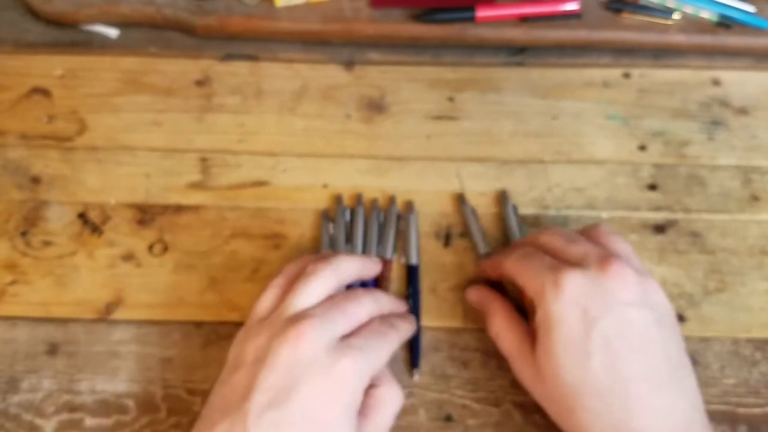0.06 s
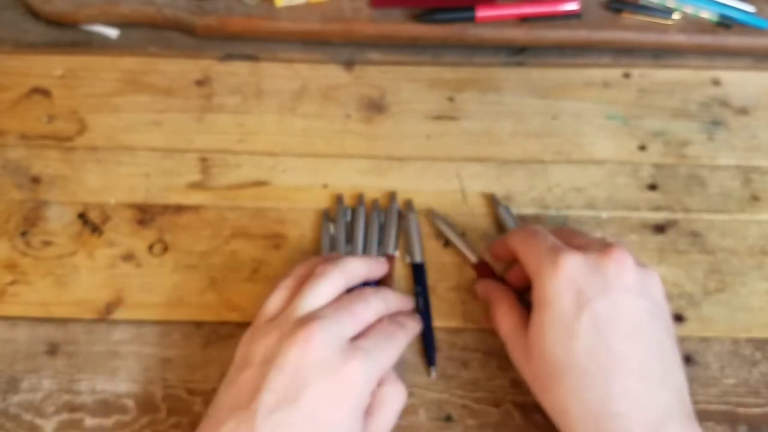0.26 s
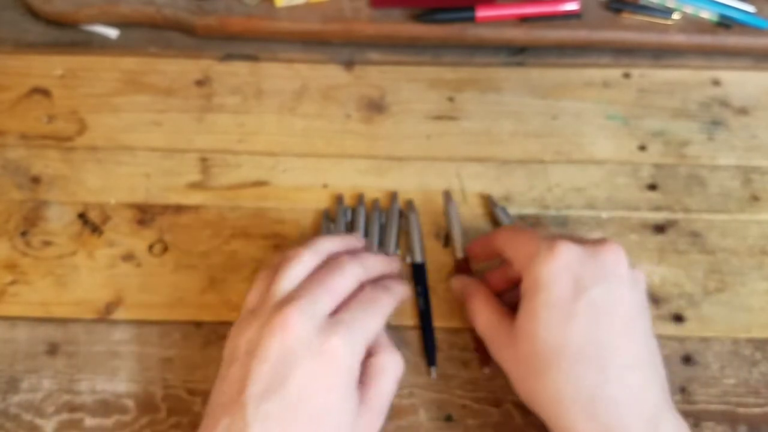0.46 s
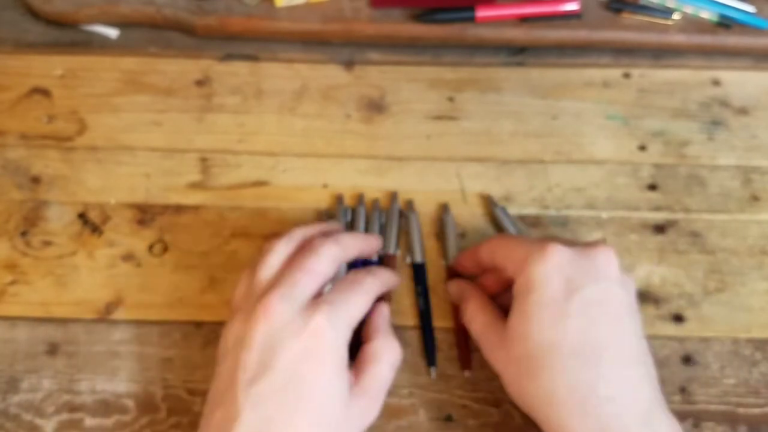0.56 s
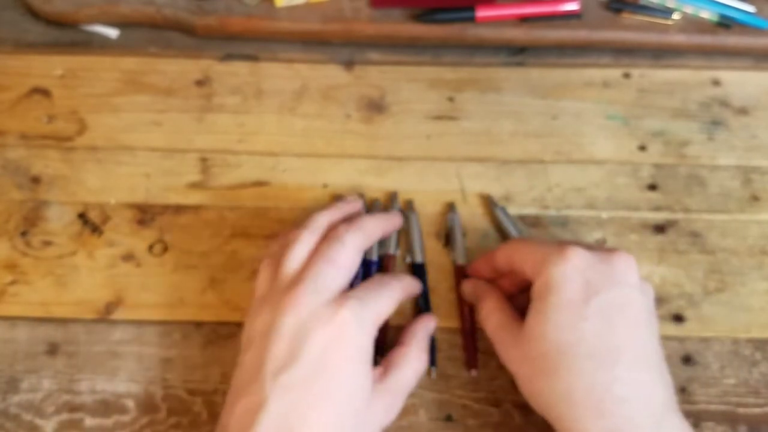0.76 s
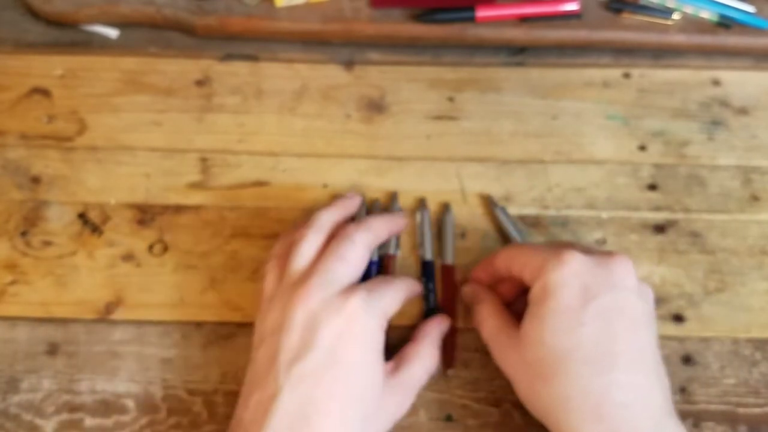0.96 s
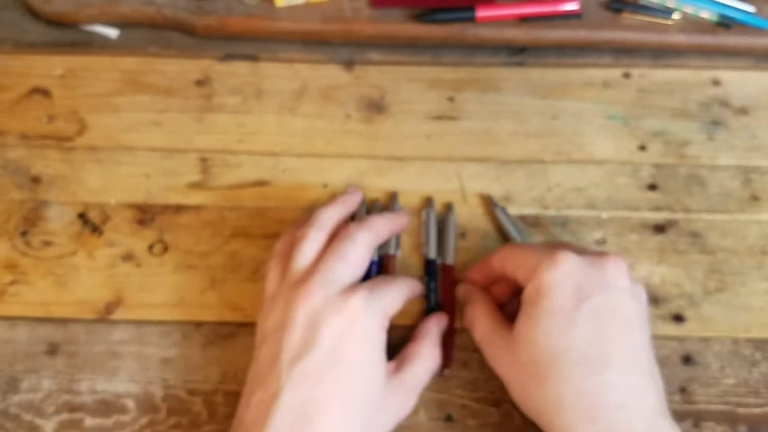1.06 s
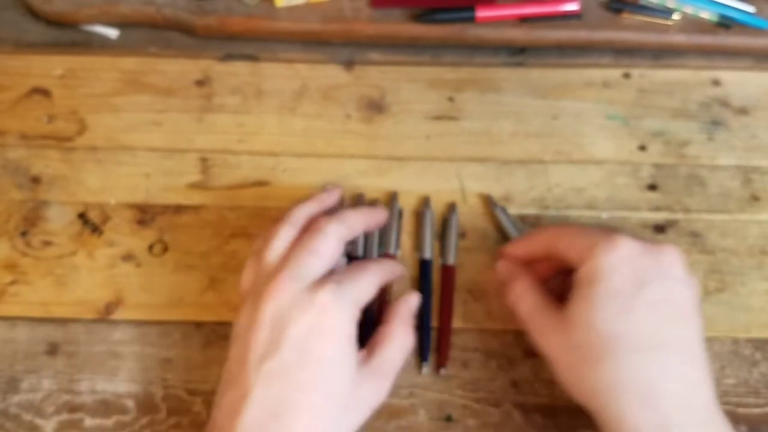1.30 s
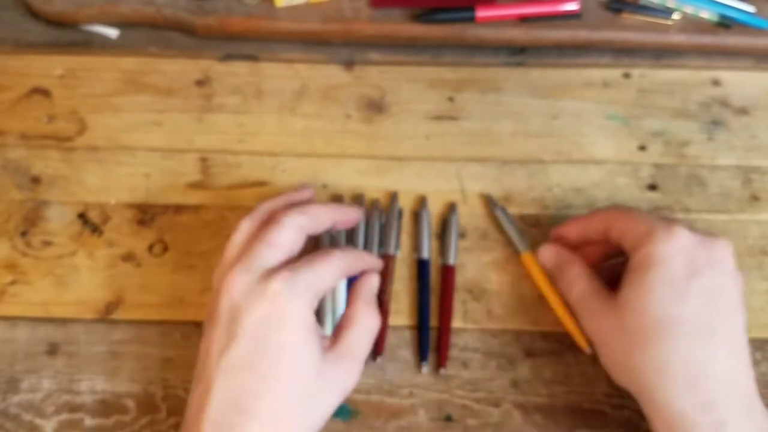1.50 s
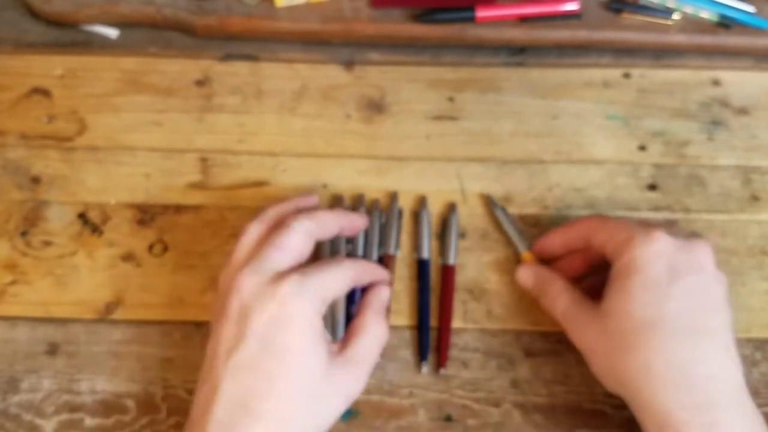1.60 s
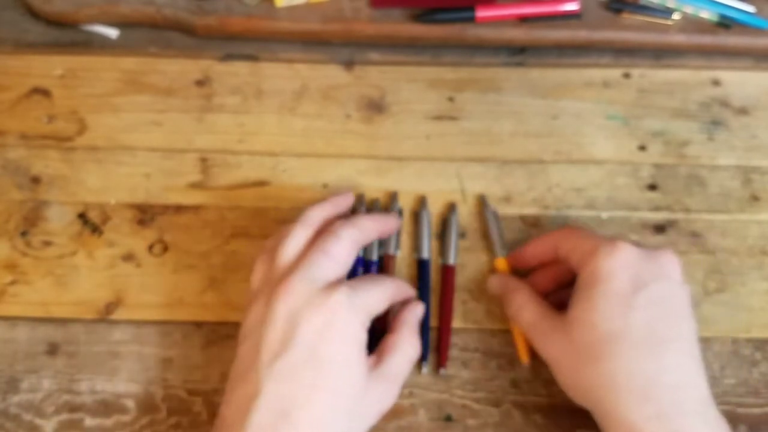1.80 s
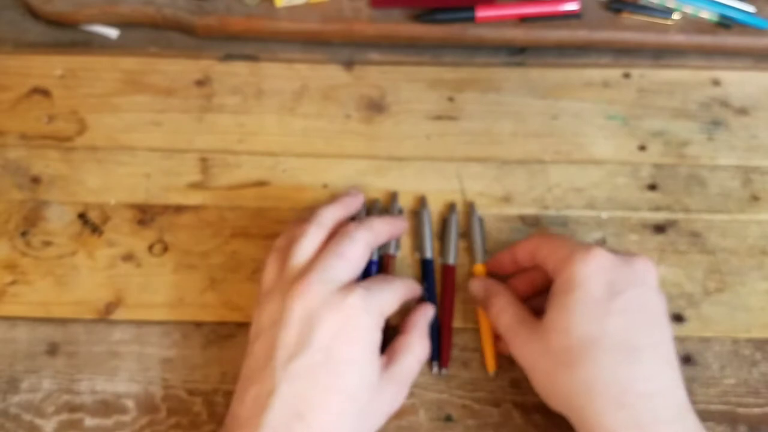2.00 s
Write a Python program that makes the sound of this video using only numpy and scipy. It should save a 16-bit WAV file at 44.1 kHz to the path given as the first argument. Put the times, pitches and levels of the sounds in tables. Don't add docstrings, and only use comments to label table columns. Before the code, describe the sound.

Pen barrels tap and slide on wood in a small quiet room, closely miked; a small cluster of clicks, a loud sharp crack, a short lull, two clear clacks, then scattered faint touches over low hum and hiss.

```python
import sys
import numpy as np
from scipy import signal
from scipy.fft import irfft
from scipy.io import wavfile

SR = 44100
rng = np.random.default_rng(int(sys.argv[2]) if len(sys.argv) > 2 else 0)


def elevation(decibels):
    levels = np.asarray(decibels, float)
    return 10 ** (levels / 20)


def wrap_up_sound(samples):
    columns = np.atleast_2d(samples).T
    tamed = np.clip(columns, -1, 1)
    steps = np.round(tamed * 32767).astype(np.int16)
    wavfile.write(sys.argv[1], SR, steps)


N = 90404
TAIL = 16384
DELAY_S = 0.001042
MODE_SPREAD_DB = 2.0


def rms_one(x):
    return x / np.sqrt(np.mean(x ** 2) + 1e-20)


def at_hz(points, hz):
    table = np.array(points)
    return np.interp(np.log(hz), np.log(table[:, 0]), table[:, 1])


def drift(rate_hz):
    pole = np.exp(-80 * np.pi * rate_hz / SR)
    white = rng.standard_normal(N // 40 + 2002)
    slow = signal.lfilter([1], [1, -2 * pole, pole * pole], white)[2000:]
    return np.interp(np.arange(N) / 40, np.arange(len(slow)), rms_one(slow))


def high_pass(x, cut_hz, order=2):
    return signal.sosfilt(signal.butter(order, cut_hz, "high", fs=SR, output="sos"), x)


def band_pass(x, edges_hz):
    return signal.sosfilt(signal.butter(2, edges_hz, "band", fs=SR, output="sos"), x)


def soften(x, cut_hz):
    cut_hz = np.clip(cut_hz, 200, 16000)
    return signal.sosfilt(signal.butter(2, cut_hz, fs=SR, output="sos"), x)


def add(out, s, sound):
    i = max(int(s * SR), 0)
    out[:, i:i + sound.shape[1]] += sound


def dying(t60):
    t60 = np.maximum(np.asarray(t60), .002)
    return elevation(-60 * np.arange(TAIL) / SR / t60[..., None])


EDGES = 28 * 2 ** np.arange(0, 9.6, .5)


def bands(size, alike):
    white, out = rng.standard_normal((2, 2, size + 4000)), []
    centres = np.sqrt(EDGES[1:] * EDGES[:-1])
    for k, (low, high) in enumerate(zip(EDGES, EDGES[1:])):
        mid, side = band_pass(white[k % 2], [low, high])[:, 4000:]
        c = np.clip(at_hz(alike, centres[k]), -.99, .99)
        out.append(np.sqrt(1 + c) * mid + np.sqrt(1 - c) * side * [[1], [-1]])
    return centres, np.array(out)


# (frequency [Hz], coherence [-1 to 1])
NEAR_COHERENCE = [(100, .98), (350, .93), (700, .5), (1300, -.15), (3000, .3), (12000, .2)]


def dense(spectrum, t60_table):
    hz, noise = bands(TAIL, NEAR_COHERENCE)
    decay = elevation(at_hz(spectrum, hz))[:, None] * dying(at_hz(t60_table, hz))
    out = np.sum(noise * decay[:, None], axis=0)
    return out / np.sqrt(np.mean(out[:, :128] ** 2)) / 2


def ringing(modes, spread_db):
    hz, db, t60 = np.transpose(modes)
    luck = rng.standard_normal((len(hz), 3))
    lag = np.arccos(np.clip(at_hz(NEAR_COHERENCE, hz), -1, 1)) * np.sign(luck[:, 2])
    phase = 2 * np.pi * hz[:, None] * np.arange(TAIL) / SR
    decay = dying(np.minimum(t60, .2))
    channels = []
    for k in (0, 1):
        waves = np.sin(phase + k * lag[:, None] * (phase > np.pi))
        channels.append(elevation(db + spread_db * luck[:, k]) @ (waves * decay))
    return np.array(channels)


# (time [s], peak level [dB])
LANDING = [
    (0.429, -12.5),
]
# (delay [s], level [dB])
BOUNCES = [
    (0, -4),
    (.0014, 1),
    (.0031, -1),
    (.0045, -6),
    (.008, -6),
]
# (frequency [Hz], level [dB], t60 [s])
LANDING_MODES = [(161.5, -14.5, 0.53), (214, -26.5, 0.28), (306.4, -9.5, 0.062), (475, -11.5, 0.062),
                 (559, -3.5, 0.1), (767, -6, 0.1), (1066, -1.5, 0.038), (1620, -12.5, 0.087),
                 (2065, -11, 0.05), (2348, -13, 0.17), (2368, -12, 0.045), (2540, -13.5, 0.11),
                 (2950, -21, 0.11), (3000, -29, 0.023)]
# (frequency [Hz], level [dB], t60 [s])
BARREL_MODES = [(2035, -5.5, 0.008), (2400, -2.5, 0.007), (3200, -13.5, 0.015), (4430, -14, 0.007)]
# (frequency [Hz], t60 [s])
CRACK_T60 = [(150, 0.12), (600, 0.17), (1500, .03), (2500, .015), (6000, 0.013)]
# (frequency [Hz], density [dB per Hz])
WOOD_SPECTRUM = [(59, -30), (100, -2.5), (676, -10.5), (1310, 2), (1520, -2.5), (2320, 0.5), (4570, -7.5),
                 (6150, -38), (16000, -14)]


def knock():
    cut_hz, low_hz = 6170, 380
    dense_db, modes_db = -6.5, -8
    build_s = .002
    out, (s, db) = np.zeros((2, N + TAIL)), LANDING[0]
    fade_in = np.minimum(np.arange(TAIL) / SR / build_s, 1)
    ring = ringing(LANDING_MODES, MODE_SPREAD_DB) * fade_in
    add(out, s + DELAY_S, -elevation(db + modes_db) * ring)
    for delay, touch_db in BOUNCES:
        body = elevation(dense_db) * dense(WOOD_SPECTRUM, CRACK_T60) - ringing(BARREL_MODES, MODE_SPREAD_DB)
        crack = high_pass(soften(body, cut_hz), low_hz)
        add(out, s + DELAY_S + delay, elevation(db + touch_db) * crack)
    return out[:, :N]


# (time [s], peak level [dB], strongest ring [Hz], plank boom re tap [dB], ring re tap [dB])
LIGHT_TAPS = [(0.001, -40, 1250, -18, -12), (0.056, -45, 575, -1, -5), (0.087, -49, 762, -21, 14.5),
              (0.12, -45.5, 1120, -18, 5), (0.175, -40.5, 1090, -9.5, -10), (0.187, -32, 1270, -11.5, -9.5),
              (.1925, -31.5, 1220, -24, -3), (0.2, -28, 1007, -14.5, 2.5), (.208, -49.5, 810, 2, -8),
              (0.214, -40, 705, -16, -4), (0.296, -49, 930, -0.5, 3), (0.349, -42.5, 1510, -5, -5),
              (0.391, -41, 560, -3.5, -13), (.834, -60, 557, -2, 0), (.878, -50.5, 740, -2, 0),
              (.9, -43, 780, -12, -6), (0.915, -28.5, 1144, -9, 0.5), (.947, -45.5, 920, 6, -12),
              (0.9895, -25, 1166, -52, 0.5), (.997, -33, 800, -13, 8.5), (1.005, -37.5, 790, -17, 6.5),
              (1.2595, -36.5, 1156, -6, -5), (1.2825, -40.5, 984, -3.5, 10), (1.352, -50.5, 550, -9, -1),
              (1.403, -54.5, 1280, -12, -1), (1.487, -52.5, 946, -7, 3), (1.545, -47.5, 590, -3.5, -8),
              (1.603, -58, 570, 1, -7), (1.66, -44.5, 820, -24, -5), (1.682, -49, 580, -3.5, 0),
              (1.761, -45, 976, 0, 7), (1.784, -52.5, 1200, 5, 13), (1.899, -41, 1144, -8, 3),
              (1.91, -45.5, 1460, -8, -14), (2.028, -47, 940, -27, -5), (2.04, -46, 770, -25, 3.5),
              (1.043, -43, 1020, -7.5, 4)]
# (frequency [Hz], level [dB], t60 [s])
PLANK_MODES = [(163.6, -11, 0.6), (223.6, -20, 0.033), (292, 5.5, 0.047), (323, -8.5, 0.27),
               (442, -4, 0.12)]
# (frequency [Hz], t60 [s])
WOOD_DECAY = [(150, 0.19), (600, 0.089), (2000, 0.039), (6000, 0.01), (14000, 0.014)]


def taps():
    cut_hz, harder_per_db = 1657, 0.18
    low_hz = 507
    boom_trim_db, dense_db, ring_trim_db, ring_t60 = -4.5, 4.5, -2.5, .028
    out = np.zeros((2, N + TAIL))
    woods = [high_pass(dense(WOOD_SPECTRUM, WOOD_DECAY), low_hz) for k in range(5)]
    for k, (s, db, hz, boom_db, ring_db) in enumerate(LIGHT_TAPS):
        boom = elevation(boom_trim_db + boom_db) * ringing(PLANK_MODES, 2.0)
        wood = elevation(dense_db) * woods[k % 5]
        barrel = [(hz, ring_trim_db, ring_t60), (0.95 * hz, ring_trim_db - 15.5, ring_t60)]
        body = boom + wood + elevation(ring_db) * ringing(barrel, MODE_SPREAD_DB)
        hardness = elevation(harder_per_db * (db + 31.5))
        add(out, s + DELAY_S, -elevation(db) * soften(body, cut_hz * hardness))
    return out[:, :N]


# (frequency [Hz], density [dB per Hz])
METAL_SPECTRUM = [(1200, -26), (2500, 2), (4300, -2), (6500, -8.5), (8500, -5.5), (11000, -5.5),
                  (15000, -0.5), (16500, -0.5)]


def snap():
    hz = np.maximum(np.arange(65) * SR / 128, 1)
    click = irfft(elevation(at_hz(METAL_SPECTRUM, hz)))
    return np.roll(click, 64)[None] / np.sqrt(np.sum(click ** 2))


# (time [s], peak level [dB], centre [Hz], width [octaves], rattle length [s])
METAL_TICKS = [(0.033, -50.5, 9250, 0.94, 0.0033), (0.058, -46, 11000, 3.8, 0.003),
               (0.187, -34.5, 12800, 3.2, 0.0022), (.298, -48, 9000, 3.3, 0.0051),
               (0.351, -43.5, 4600, 1.57, 0.0014), (.391, -44.5, 4600, 1.5, 0.0033),
               (0.4312, -21.5, 9800, 1.01, 0.00074), (0.624, -54.5, 8000, 4.8, 0.01),
               (0.909, -49.5, 12100, 0.48, 0.0069), (0.937, -26, 8820, 2.9, 0.0031),
               (1.0005, -45.5, 7240, 0.4, 0.00094), (1.018, -49, 8500, 0.094, 0.00077),
               (1.045, -35.5, 8600, 1.6, 0.0022), (1.261, -55.5, 9000, 1.34, 0.0021),
               (1.387, -55, 14200, 0.53, 0.00077), (1.724, -44.5, 8600, 1.86, 0.0032),
               (1.725, -52, 4330, 0.58, 0.0044), (1.726, -46.5, 2500, 0.28, 0.0016),
               (1.898, -55, 7040, 1.9, 0.0052), (2.019, -56, 2470, 0.18, 0.017)]


def ticks():
    own_share = .9
    trim_db = 2
    out = np.zeros((2, N + 2 * TAIL))
    for s, db, hz, octaves, length in METAL_TICKS:
        t = np.arange(4096) / SR / max(length, .0002)
        luck = rng.standard_normal((4, 4096))
        touching = luck[0] > .4
        contacts = touching * (luck[1] + own_share * luck[2:]) * (t + 0.49) * np.exp(-t)
        edges = np.clip(hz * 2 ** (np.array([-.5, .5]) * max(octaves, .1)), 500, 19000)
        sound = band_pass(signal.fftconvolve(contacts, snap(), axes=1), edges)
        add(out, s - 64 / SR, elevation(db + trim_db) * sound / np.abs(sound).max())
    return out[:, :N]


# (start [s], length [s], level [dB], skin hiss brightness [dB])
STROKES = [(-.02, 0.05, -44, -12), (0.061, 0.052, -48, -17), (0.11, 0.098, -57, -8.5),
           (0.191, 0.055, -48, -9.5), (0.213, 0.2, -61, -28), (0.84, 0.053, -64, -29),
           (0.886, 0.095, -45.5, -18), (0.916, 0.026, -39.5, -37), (0.984, 0.05, -50.5, -3),
           (1.251, 0.11, -55, -39.5), (1.387, 0.24, -66.5, -6), (1.543, 0.18, -58.5, -19),
           (1.649, 0.11, -47.5, -19.5), (1.747, 0.15, -51, -22), (1.904, 0.016, -46, -32),
           (1.959, 0.1, -60, -28), (1.999, 0.24, -48, -17)]
# (frequency [Hz], density [dB per Hz])
RUB_SPECTRUM = [(120, -9), (290, -4.5), (550, -3), (1100, -2.5), (1800, -11.5), (2450, -18.5),
                (4500, -29.5), (9000, -43)]
# (frequency [Hz], t60 [s])
HISS_T60 = [(3000, .003), (16000, .002)]


def rubbing():
    slips_per_s, trim_db = 1600, 0.5
    clumping = elevation(2.5 * drift(30))
    slips = (rng.random(N) < slips_per_s * clumping / SR) * rng.standard_normal(N)
    stroke, hiss, t = np.zeros(N), np.zeros(N), np.arange(N) / SR
    for s, length, db, bright_db in STROKES:
        progress = np.clip((t - s) / length, 0, 1)
        swell = elevation(db + trim_db) * np.sin(np.pi * progress ** 0.56) ** 2
        stroke += swell
        hiss += swell * elevation(bright_db)
    wood = dense(RUB_SPECTRUM, WOOD_DECAY) + elevation(-18) * ringing(PLANK_MODES, 3.0)
    metal = dense(METAL_SPECTRUM, HISS_T60)
    out = 0
    for grain, pressure in ((wood, stroke), (metal, hiss)):
        unit_grain = grain / np.sqrt(np.sum(grain[0] ** 2))
        force = (rms_one(slips) * pressure)[None]
        out = out + signal.fftconvolve(force, unit_grain, axes=1)[:, :N]
    return out


# (time [s], level [dB], frequency [Hz], length [s])
HAND_LEANS = [
    (0.686, -56, 88, .1),
    (0.778, -55, 92, 0.1),
    (0.631, -66.5, 450, 0.15),
    (1.27, -53, 86.4, 0.089),
    (1.478, -53, 57.3, 0.15),
    (1.83, -63, 90, 0.067),
]


def leans():
    t, out = np.arange(N) / SR, 0
    for s, db, hz, length in HAND_LEANS:
        swell = np.sin(np.pi * np.clip((t - s) / length, 0, 1)) ** 2
        out = out + elevation(db) * swell * np.sin(2 * np.pi * hz * t)
    return out


# (frequency [Hz], t60 [s])
ROOM_DECAY = [(100, 0.22), (260, 0.32), (700, 0.24), (1840, 0.21), (4850, 0.27), (12800, 0.13)]


def room(near):
    level_db, build_s = -20, .007
    # (frequency [Hz], density [dB per Hz])
    colour = [(100, -13), (300, -3), (1000, -4.0), (3000, -1), (5000, -7.0), (7000, 0), (16000, 3.0)]
    build_up = np.minimum(np.arange(TAIL) / SR / build_s, 1)
    answer = dense(colour, ROOM_DECAY) * build_up
    return elevation(level_db) * signal.fftconvolve(near[:1], answer, axes=1)[:, :N] / 2


# (frequency [Hz], density [dB per Hz])
AIR_SPECTRUM = [(30, -7), (60, -12), (100, -7), (200, -11), (300, -16), (1000, -22.5), (3000, -27.5),
                (7500, -42), (14000, -35.5), (16000, -30)]
# (frequency [Hz], coherence [-1 to 1])
AIR_COHERENCE = [(60, 1), (240, 0.53), (950, 0.26), (4000, 0.083), (15000, .1)]
# (frequency [Hz], rms level [dB])
HUM_TONES = [(45, -65), (67.5, -63.5), (90, -76)]


def background():
    air_db, top_hz = -62, 16150
    patchy_db, wobble_db = 0.9, 2.6
    hz, noise = bands(N, AIR_COHERENCE)
    air = sum(band * elevation(at_hz(AIR_SPECTRUM, f) + patchy_db * drift(0.74)) for f, band in zip(hz, noise))
    level = elevation(air_db) / air[0].std()
    out = level * signal.sosfilt(signal.cheby2(10, 40, top_hz, fs=SR, output="sos"), air)
    for f, db in HUM_TONES:
        turns = f * np.arange(N) / SR + rng.random()
        out = out + np.sqrt(2) * elevation(db + wobble_db * drift(1.6)) * np.sin(2 * np.pi * turns)
    return out


def scene():
    wood_pan_db, metal_pan_db = -1.17, -4.5
    halves = np.array([[.5], [-.5]])
    wood = knock() + taps() + rubbing()
    near = wood * elevation(halves * wood_pan_db) + ticks() * elevation(halves * metal_pan_db)
    near = high_pass(near, 125, order=4)
    return near + room(near) + background() + leans()


def low_pass(x):
    return signal.sosfilt(signal.butter(12, 16450, fs=SR, output="sos"), x)


def record(dry):
    finished = signal.sosfilt(signal.cheby2(12, 60, 16600, fs=SR, output="sos"), dry)
    return low_pass(finished)


dry = scene()
out = record(dry)
wrap_up_sound(out)
```